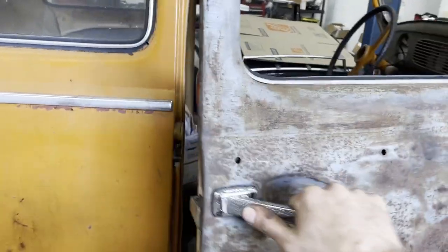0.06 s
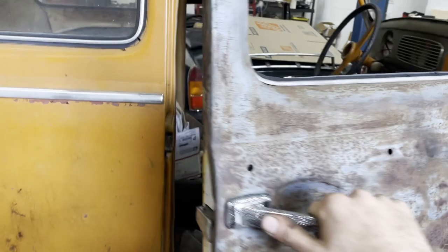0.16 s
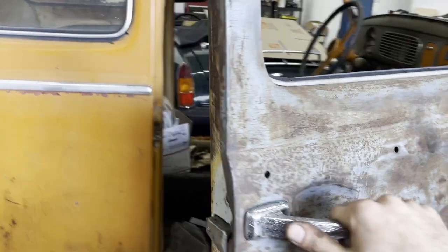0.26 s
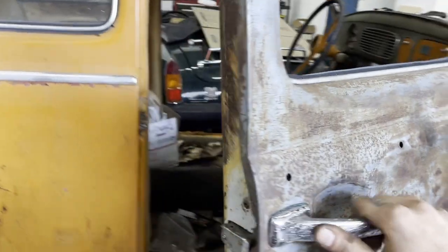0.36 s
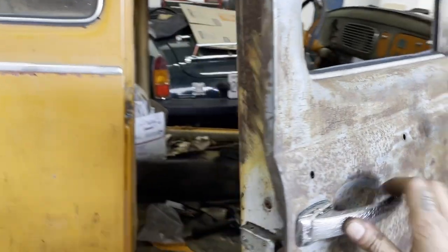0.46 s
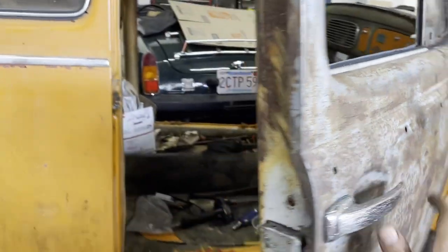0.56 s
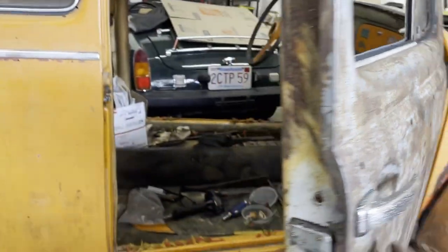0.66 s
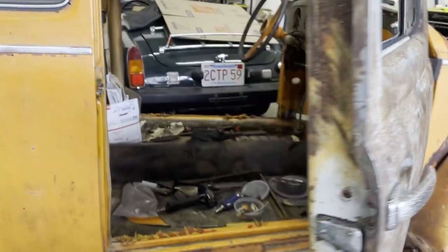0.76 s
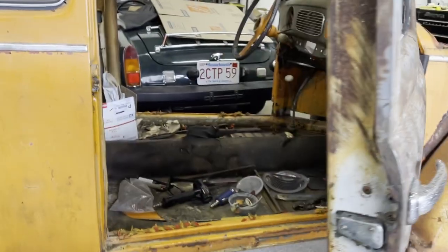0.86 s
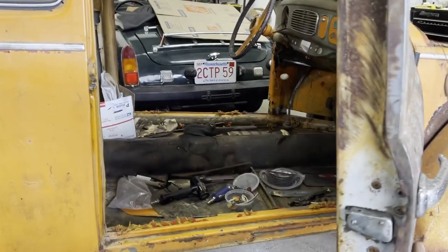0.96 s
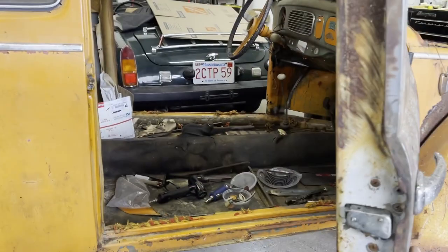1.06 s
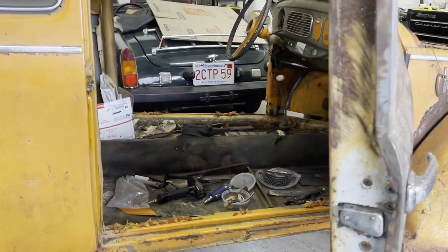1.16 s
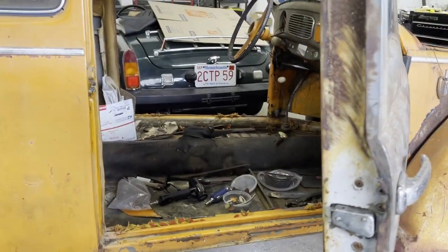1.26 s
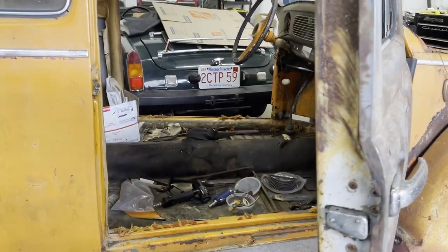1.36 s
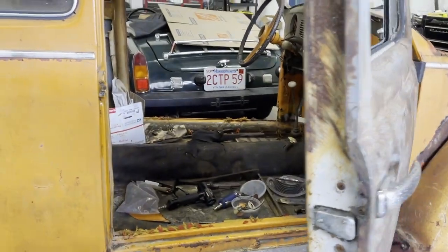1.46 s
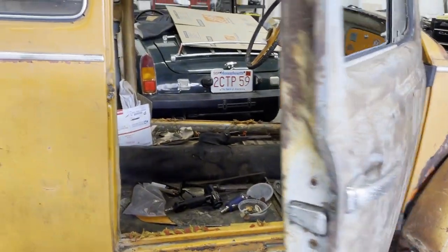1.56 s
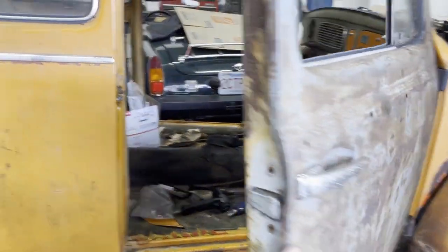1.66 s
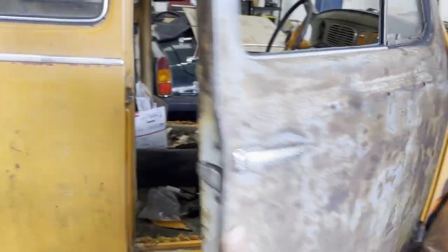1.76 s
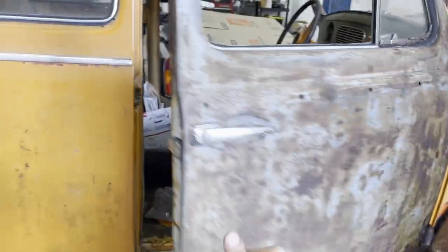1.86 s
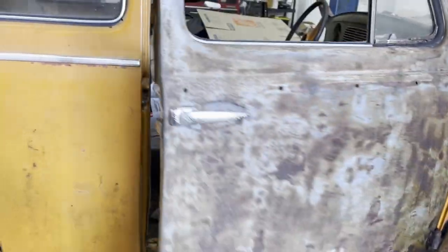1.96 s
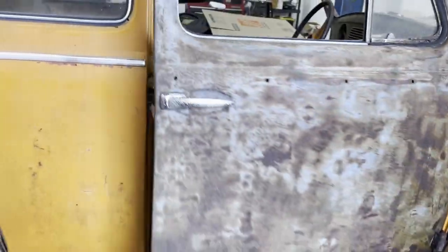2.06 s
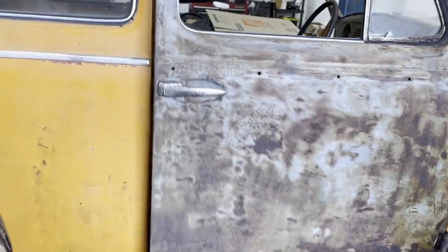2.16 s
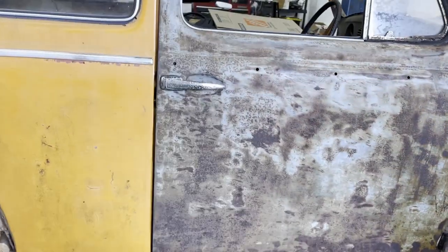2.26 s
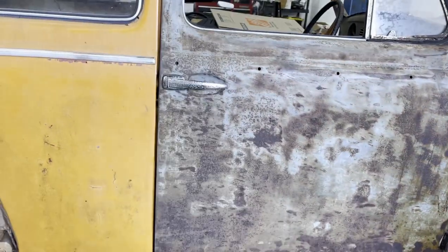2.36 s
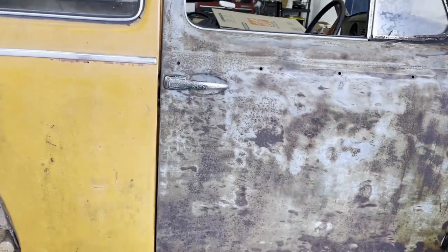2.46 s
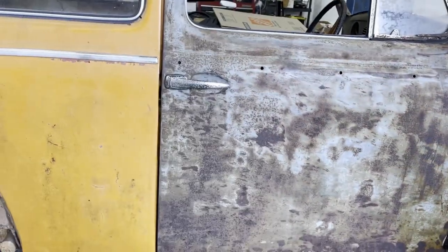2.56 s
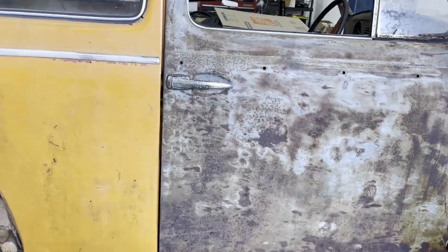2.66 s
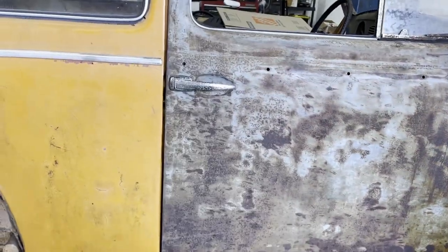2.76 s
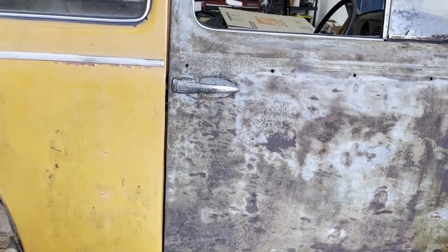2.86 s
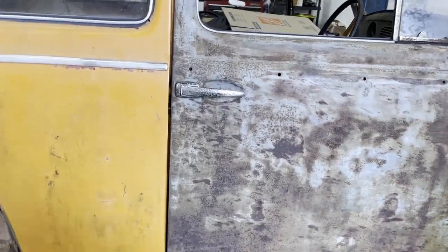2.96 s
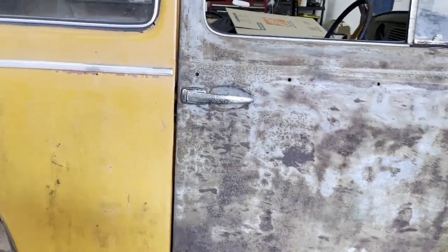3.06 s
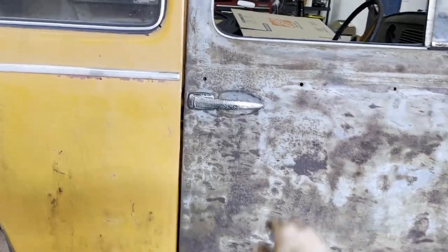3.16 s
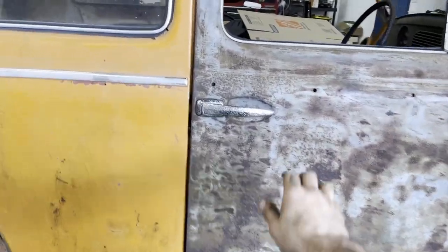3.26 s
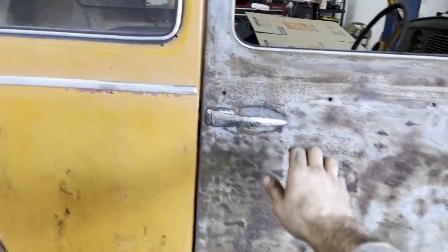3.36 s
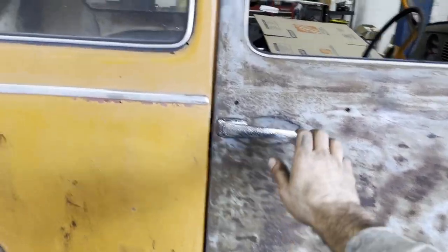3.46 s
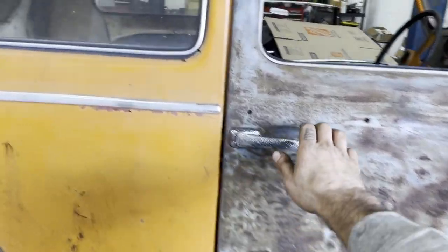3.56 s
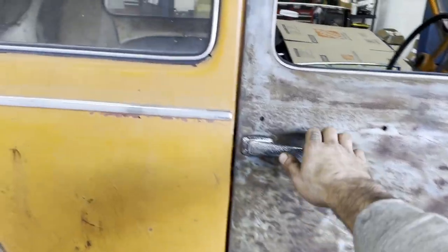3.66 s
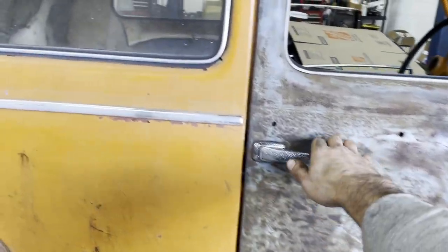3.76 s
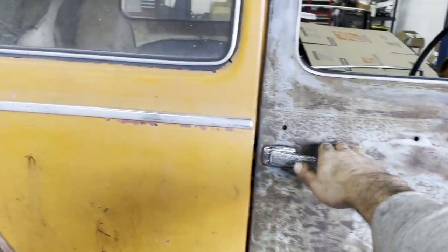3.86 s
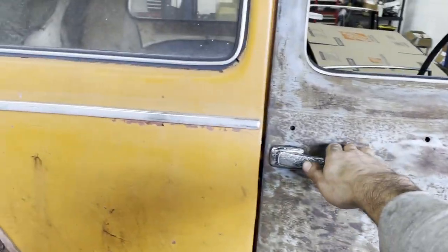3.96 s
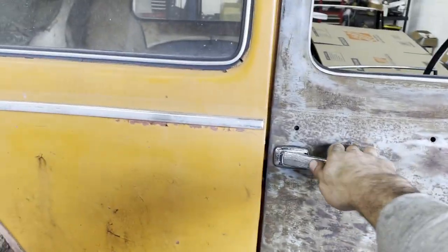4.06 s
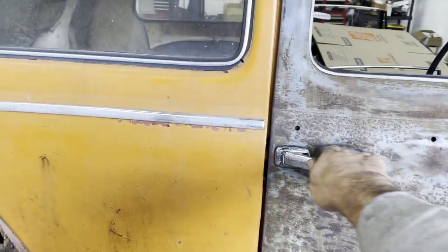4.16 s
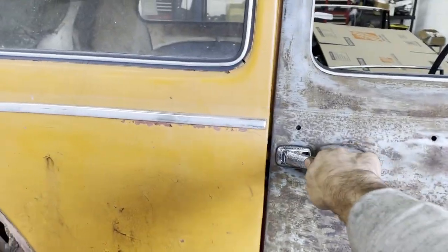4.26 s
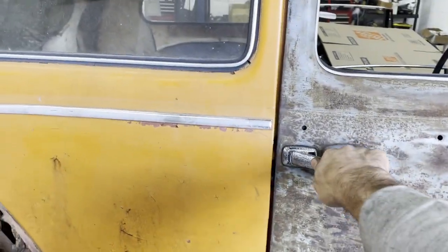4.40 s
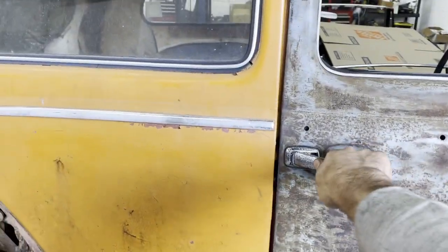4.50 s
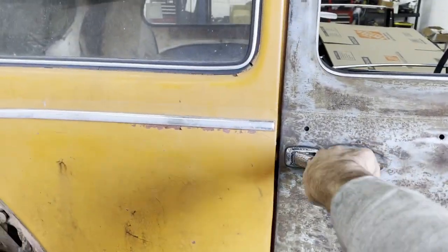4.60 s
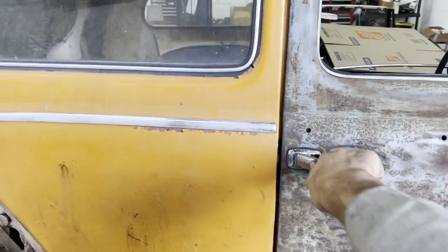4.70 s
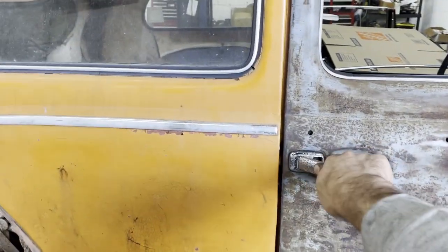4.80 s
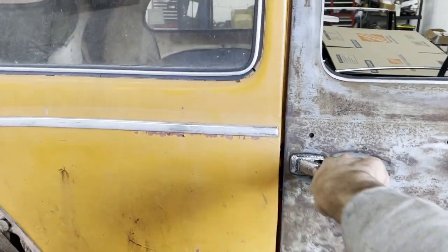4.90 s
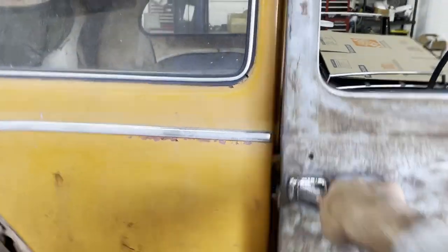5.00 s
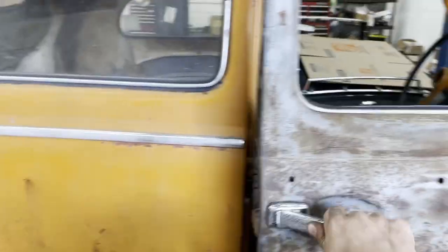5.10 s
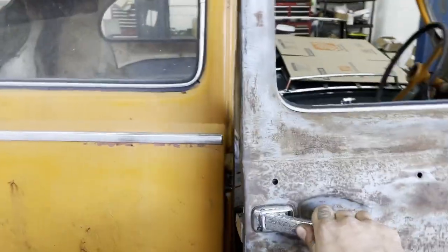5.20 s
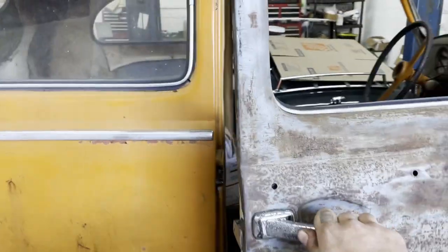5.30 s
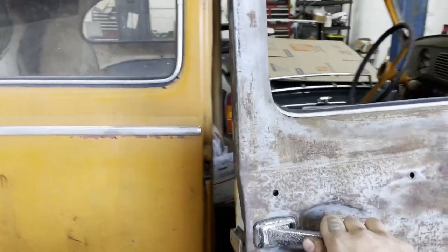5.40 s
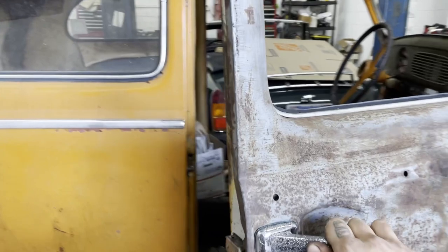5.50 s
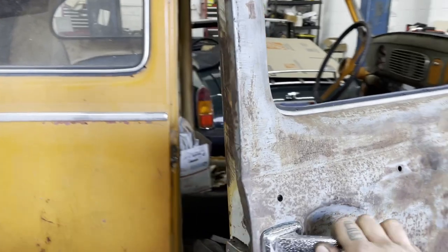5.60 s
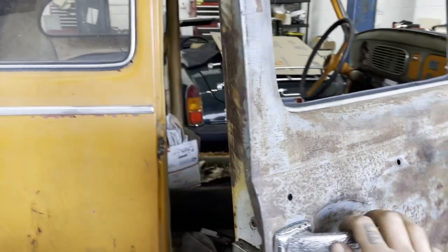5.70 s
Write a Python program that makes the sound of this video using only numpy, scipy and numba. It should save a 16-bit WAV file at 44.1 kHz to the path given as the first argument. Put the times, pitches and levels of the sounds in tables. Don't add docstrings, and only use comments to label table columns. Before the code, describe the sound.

A phone held about a metre away in a hard-walled garage with faint ventilation hum and hiss. At 0 s a heavy bare steel car door comes off its latch with a dull clunk, then until about 1 s it swings with stuttering low groans, steely creaks, hand thumps and rattling loose trim, with sharper knocks near 0.5 s. Small ticks and faint rubbing fill the quieter stretch to 2.2 s. At 2.28-2.36 s the door slams: a rapid run of clacks and deep booms, sheet metal ringing and walls echoing into a decay. From 2.9 to 3.9 s the body settles with low creaks, knocks and ticks. Around 4.07-4.25 s a hand grips and turns the handle with light clinks. At 4.62 s the latch snaps hard, clicking again at 4.72 s. At 4.95-5.14 s the door pops free with hollow knocks and a low airy thud; hinges groan and thump around 5.6 s.

```python
import sys
import numpy as np
from scipy import signal
from scipy.fft import rfft, irfft
from scipy.io import wavfile
from scipy.ndimage import uniform_filter1d
from numba import njit

SR = 44100
rng = np.random.default_rng(int(sys.argv[2]) if len(sys.argv) > 2 else 0)


def how_loud(loudness_db):
    steps = np.asarray(loudness_db, float) / 20
    return 10 ** steps


def store_wav(level_fs):
    pcm = np.round(np.clip(np.atleast_2d(level_fs), -1, 1) * 32767)
    wavfile.write(sys.argv[1], SR, pcm.T.astype(np.int16))


N = 253134

# columns f/Hz, level/dB, time to fade 60 dB/s
SHUT_MODES = [(176, 0.84, 0.33), (294.6, 0.68, 0.17)]
AJAR_MODES = [(75.36, 2.5, 0.62), (143, -7.5, 0.42), (294, -11, 0.3)]
# columns f/Hz, level/dB per Hz
SHUT_SKIN = [(18, -31), (30, 5.5), (277, 4.5), (546, -17.5), (709, -19), (1330, -17), (1440, -16),
             (2020, -26), (6050, -40.5), (7260, -33.5), (8060, -69), (9500, -81), (11900, -83.5),
             (15500, -114)]
AJAR_SKIN = [(18, -65), (30, -22.5), (85, -3.5), (192, -8.5), (230, -8), (299, -11.5), (518, -24),
             (591, -23.5), (709, -30.5), (1140, -32), (1820, -41), (6540, -42.5), (15500, -64.5)]


def unit(x):
    return x / np.sqrt(np.mean(x ** 2) + 1e-30)


def along(table, hz):
    f, v = np.transpose(table)
    return np.interp(np.log(hz + 1), np.log(f + 1), v)


def colour(x, gain):
    return irfft(rfft(x) * gain(np.fft.rfftfreq(x.shape[-1], 1 / SR)), x.shape[-1])


def wobble(rate, size):
    return unit(colour(rng.standard_normal(size), lambda hz: np.exp(-(hz / rate) ** 2)))


def fading(t, t60):
    return np.exp(-np.log(1000) * t / t60)


def hum():
    spectrum = [(15, -23.5), (25, -8.5), (64, 5.5), (344, -7.5), (373, -0.5), (404, -2.5), (438, 2.5),
                (1960, -15), (3540, -28.5), (5280, -28.5), (12500, -53), (15000, -80.5)]
    mid, side = colour(rng.standard_normal((2, N)), lambda hz: how_loud(along(spectrum, hz)))
    side = colour(side, lambda hz: 1.6 * hz / (hz + 600))
    return how_loud(-52) * unit(np.array([mid + side, mid - side]))


def strokes(rows, swell, fade):
    t = np.arange(0, N + 64, 64) / SR
    gain = 0
    for start, hold, db in rows:
        early = np.maximum(start - t, 0)
        late = np.maximum(t - start - hold, 0)
        gain = gain + how_loud(db - swell * early - fade * late)
    return np.interp(np.arange(N) / SR, t, gain)


def grains(rate, spread_db):
    happens = rng.random(N) < rate / SR
    return unit(happens * rng.choice([-1, 1], N) * how_loud(spread_db * rng.standard_normal(N)))


def groan():
    # columns start/s, hold/s, level/dB
    swing = [(0, 0.074, -36.5), (.29, 0.19, -21.5), (.5, 0.12, -23), (.68, 0.15, -24.5), (.93, 0.138, -49),
             (1.28, 0.017, -61.5), (1.47, 0.023, -59), (1.85, 0.08, -57), (2.1, 0.087, -57),
             (5.57, 0.05, -31), (5.66, 0.14, -28)]
    settle = [
        (2.9, 0.11, -42.5),
        (3.19, 0.042, -38.5),
        (3.29, 0.093, -37),
        (3.4, 0.288, -36.5),
    ]
    grip = [
        (3.85, 0.1705, -51),
        (4.07, 0.222, -39.5),
        (4.35, 0.31, -50),
    ]
    # columns f/Hz, level/dB per Hz
    swing_colour = [(15, -41.5), (45, 2.5), (80, 1), (170, -6), (340, -11), (480, -17), (650, -46),
                    (1100, -120)]
    settle_colour = [(15, -33), (102, 0), (136, -8.5), (168, -0.5), (227, -55), (500, -4.5), (650, -37),
                     (1100, -120)]
    grip_colour = [(15, -47), (64, 9.5), (139, -4.5), (274, -1.5), (436, 2.5), (500, -11), (650, -34),
                   (1100, -120)]
    jerks = grains(160, 2.66)
    out = 0
    for rows, spectrum in ((swing, swing_colour), (settle, settle_colour), (grip, grip_colour)):
        voice = colour(jerks, lambda hz: how_loud(along(spectrum, hz)) / (1 + (hz / 600) ** 4))
        out = out + strokes(rows, swell=902, fade=251.5) * unit(voice)
    return how_loud(3.0) * out


def creak():
    resonances = [(456, 66, 2.5), (534.6, 70, 9), (624.4, 70, 7), (880, 180, -6)]
    moves = [(0, 0.26, -26), (.29, 0.028, -27.5), (.415, 0.08, -24.5), (.5, 0.074, -28), (.65, 0.2, -29.5),
             (1, .04, -39), (1.11, 0.025, -36), (3.21, 0.066, -30), (3.33, 0.053, -24),
             (3.425, 0.21, -27.5), (3.65, 0.038, -31.5), (4.07, 0.029, -33.5), (4.17, 0.1, -33),
             (5.6, 0.011, -29), (5.64, 0.031, -35)]
    jerks = grains(260, 3.5)
    ring = 0
    for hz, width, db in resonances:
        peak = signal.iirpeak(hz, hz / width, SR)
        ring = ring + how_loud(db) * signal.lfilter(*peak, signal.lfilter(*peak, jerks))
    return how_loud(-13.5) * strokes(moves, swell=701.5, fade=300) * unit(ring)


def rustle():
    spectrum = [(410, -35.5), (700, 0.5), (1140, -1), (1700, -9.5), (2500, -5), (3950, -15.5),
                (5590, -16.5), (8110, -22), (12400, -34.5), (15000, -63.5)]
    moves = [(0, 0.11, -37), (.2, 0.34, -53), (.5, 0.027, -41), (.77, 0.019, -47), (.86, 0.38, -52),
             (1.68, 0.17, -60.5), (1.795, 0.029, -52.5), (1.83, .018, -41), (2.205, 0.15, -50),
             (2.95, 0.21, -60), (2.85, 0.66, -57), (3.63, 0.095, -55.5), (3.92, 0.018, -57.5),
             (4.11, 0.16, -53), (5.35, 0.31, -66.5), (5.68, 0.066, -56.5)]
    rubbing = rng.standard_normal(N) * how_loud(1.5 * wobble(40, N))
    rubbing = unit(colour(rubbing, lambda hz: how_loud(along(spectrum, hz))))
    return strokes(moves, swell=606.5, fade=197.5) * rubbing


def pings(rows, buzz_db, cycles=1.63, wander=0.):
    out, t = np.zeros(N + SR), np.arange(SR) / SR
    buzz = np.tanh(wobble(150, N))
    for s, db, hz, t60 in rows:
        loose = wander * np.roll(buzz, int(hz))[:SR]
        swell = 1 - np.exp(-t * hz / cycles)
        note = np.sin(2 * np.pi * hz * t + loose) * fading(t, t60) * swell
        start = int(s * SR)
        out[start:start + SR] += how_loud(db) * note
    return out[:N] * how_loud(buzz_db * buzz)


def handle_and_latch():
    let_go = [(2030, 0, 0.098), (2417, -13, 0.69), (2977, -13, 0.48), (3284, -24, 5.0), (4506, -29, 1.2),
              (5405, -23, 0.87), (6772, -29, 0.59)]
    touch = [(3822, -29, 0.066), (3790, -38, 0.49), (3840, -43, .3), (3760, -28.5, 0.09), (7540, -40, 0.03),
             (7360, -46, 0.092)]
    turn = [(2603, -30, 0.095), (2660, -36.5, 0.46), (2740, -40, .3), (5500, -37, .04), (5120, -46, .15),
            (2800, -36.5, 0.22), (2900, -39, 0.18), (3120, -34.5, 0.046), (5260, -47, 0.35),
            (5330, -46, .2), (5750, -46, .12), (5280, -39, 0.055), (5660, -42, 0.06), (5450, -49, .04)]
    rows = [(0, -36 + db, hz, min(t60, .5)) for hz, db, t60 in let_go]
    rows += [(4.146, db, hz, t60) for hz, db, t60 in touch]
    rows += [(4.229, db, hz, t60) for hz, db, t60 in turn]
    return pings(rows, buzz_db=4, cycles=3, wander=1.6)


def tail(spectrum, t60s, size=65536):
    t, f = np.arange(size) / SR, np.fft.rfftfreq(size, 1 / SR)
    noise = rfft(rng.standard_normal(size)) * how_loud(along(spectrum, f))
    out = 0
    for hz in 30 * 2 ** np.arange(0, 9.5, .5):
        band = np.clip(1 - 2 * abs(np.log2(f / hz + 1e-9)), 0, 1)
        t60 = along(t60s, hz)
        out = out + irfft(noise * band) * 1000. ** (-t / t60) / np.sqrt(t60)
    bins = rfft(out)
    even = how_loud(along(spectrum, f)) / np.sqrt(uniform_filter1d(abs(bins) ** 2, size=16) + 1e-30)
    out = irfft(bins * even / np.median(even)) * (t < .75 * t[-1])
    return out / np.linalg.norm(out)


def door_ring(modes, skin, modes_db):
    # columns f/Hz, t60/s
    skin_t60 = [(40, 0.88), (150, 0.75), (500, 0.41), (1500, 0.17), (4000, 0.2), (12000, 0.068)]
    t = np.arange(65536) / SR
    clear = 0
    for hz, db, t60 in modes:
        waver = 3.8 * wobble(4 + hz / 40, len(t))
        clear = clear + how_loud(db + waver) * np.sin(2 * np.pi * hz * t) * fading(t, t60)
    body = tail(skin, skin_t60) + how_loud(modes_db) * clear / np.linalg.norm(clear)
    impulse = 1. * (np.arange(1024) == 40)
    click = colour(impulse, lambda hz: how_loud(1.08 * along(skin, hz)) * hz / (hz + 700))
    window = np.minimum(np.arange(512) / 40, 1) ** 2 * np.hanning(1024)[512:]
    body[:512] += how_loud(-24.0) * click[:512] * window / np.linalg.norm(click)
    return body


def door(blows, modes, skin, modes_db, rise):
    body = door_ring(modes, skin, modes_db)
    force, u = np.zeros((3, N + 4096)), np.arange(4096) / SR
    for s, clack_db, boom_db, crack_db, length in blows:
        shape = np.exp(-u / max(length, 3e-4)) * (1 - np.exp(-u / rise))
        scrape = rng.standard_normal(4096) * shape
        for _ in range(16):
            scrape = irfft(np.exp(1j * np.angle(rfft(scrape)))) * np.minimum(1, 5 * shape)
        scrape = scrape / np.linalg.norm(scrape)
        push = np.exp(-u / rise)
        start = int(s * SR)
        for row, db, hit in zip(force, (clack_db, boom_db, crack_db), (scrape, push / push.sum(), scrape)):
            row[start:start + 4096] += how_loud(db) * hit
    edges = [([400, 3000], "band"), (400, "low"), (3000, "high")]
    out = 0
    for hits, (hz, kind), db in zip(force, edges, (-6, -1.5, -5)):
        part = signal.sosfilt(signal.butter(3, hz, kind, fs=SR, output="sos"), body)
        out = out + signal.fftconvolve(hits, how_loud(db) * part / part[:900].std())[:N]
    return out


def release():
    blows = [
        (0.002, -23, -18.5, -62, 0.0045),
        (0.058, -23, -20.5, -67, 0.0052),
        (0.504, -22, -30.5, -43.5, 0.014),
        (0.522, -37.5, -31.5, -50.5, 0.0033),
        (0.554, -20, -23.5, -41.5, 0.0053),
        (0.575, -30.5, -24, -53, 0.0016),
    ]
    return door(blows, AJAR_MODES, AJAR_SKIN, modes_db=-4, rise=0.001)


def loose_parts():
    lone = [(.486, -28, 2525, 0.09), (.497, -30, 2400, 0.08), (.06, -45, 5450, 0.2), (.585, -47, 3560, 0.2),
            (.64, -52, 3600, .4), (.59, -54, 4650, .5), (.66, -51, 4640, 0.35), (.39, -48, 3700, .05),
            (.52, -38, 2330, .1), (.55, -39, 2370, .1), (1.82, -47, 1200, .15), (1.843, -34, 1170, 0.22),
            (1.845, -39, 1090, .05), (1.81, -44, 770, .2), (1.96, -49, 1170, .15), (2.2745, -24, 1400, .02),
            (2.203, -36, 1310, 0.12), (2.203, -38, 1480, .1), (3.11, -52, 2400, .12),
            (3.195, -38, 1340, .05), (3.196, -41, 1950, .04), (3.196, -41, 2500, .04),
            (3.197, -44, 3100, .04), (3.25, -42, 1380, .05), (3.315, -42, 1400, .06),
            (3.41, -44, 2000, .04), (3.63, -36, 1328, 0.06), (3.635, -37, 1180, 0.06),
            (3.663, -39, 2000, 0.04), (3.663, -40, 1010, .05), (4.112, -50, 3800, .2),
            (4.108, -40, 1300, .06), (4.109, -46, 4200, .03)]
    knocks = [(.41, -23, 460), (.476, -29, 611), (.513, -20, 470), (.557, -20, 471), (.647, -30, 550),
              (.67, -29, 590), (.753, -20, 615), (.937, -37, 586), (.956, -24.5, 604), (1.005, -40, 598),
              (1.023, -34, 626), (1.321, -33, 570), (3.277, -26, 500), (3.469, -27, 504), (3.49, -26, 579),
              (3.54, -33, 540), (3.638, -32, 568), (3.178, -26, 642), (3.2, -28, 621), (3.249, -26.5, 648),
              (3.315, -19.5, 652), (3.41, -23.5, 546), (3.568, -27, 543), (3.659, -25.5, 517),
              (3.69, -28.5, 621), (3.755, -34, 556), (3.37, -28, 640), (3.848, -39, 547), (3.879, -31, 576),
              (3.9, -35, 593), (5.471, -39, 584), (5.601, -33.5, 610), (5.701, -36, 602)]
    trim = [(s, db, hz, 0.068) for s, db, hz in knocks]
    return pings([*lone, *trim], buzz_db=3, wander=.5)


def thumps():
    rows = [(0.291, -10, 192, 0.076), (0.375, 1.5, 92, 0.094), (0.402, -7.5, 114.5, 0.26),
            (0.583, -7.5, 165.5, 0.1), (0.768, -11, 155, 0.084), (0.825, -17, 71.2, 0.057),
            (1.045, -22, 126, 0.045), (1.075, -21, 62, 0.088), (3.283, -19, 101.3, 0.42),
            (3.32, -12, 92, 0.1), (3.558, -22, 115.7, 0.075), (4.064, -26, 290, 0.086),
            (5.563, -3, 89, 0.075), (5.605, -12.5, 137, 0.14), (5.674, -5.5, 120.6, 0.072),
            (5.697, -7.5, 95, 0.097), (5.71, -6.5, 111.5, 0.095)]
    return pings(rows, buzz_db=1.5)


def edge_snaps():
    rows = [(0.517, -36, .004, 2800), (0.549, -36, .004, 4000), (.571, -32, .006, 1000),
            (.585, -34, .005, 1100), (.872, -50, .003, 1200), (1.785, -60, .015, 9000),
            (1.812, -52, .015, 9000), (1.832, -50, .015, 8000), (2.2795, -25, .003, 5000),
            (2.293, -10, .008, 900), (2.2922, -14, .003, 10000), (2.2925, -13, .003, 2500),
            (2.333, -26, .003, 11000), (3.195, -46, .005, 1900), (3.251, -46, .004, 1300),
            (3.277, -50, .004, 2200), (3.314, -46, .004, 1600), (3.411, -48, .004, 1500),
            (3.448, -52, .003, 1200), (3.562, -49, .003, 1100), (3.585, -53, .003, 1100),
            (3.631, -49, .006, 1500), (3.663, -48, .005, 1500), (3.692, -51, .004, 2000),
            (4.108, -46, 0.005, 2500), (4.146, -56, .004, 6000), (4.229, -49, .006, 5500),
            (4.7152, -33, .004, 9000), (4.7152, -29, .004, 1600), (4.944, -50, .008, 8000),
            (4.954, -32, .004, 4000), (4.959, -29, .007, 8000), (5.008, -38, .004, 6000),
            (5.1352, -29, 0.003, 5000), (5.1352, -42, .002, 14000), (5.137, -27, .005, 900)]
    out, t = np.zeros(N + 2048), np.arange(2048) / SR
    for s, db, length, hz in rows:
        grit = rng.standard_normal(2048) * np.exp(-t / max(length, 5e-4))
        broad = signal.iirpeak(hz, .7, SR)
        burst = signal.lfilter(*broad, signal.lfilter(*broad, grit))
        start = int(s * SR)
        out[start:start + 2048] += how_loud(db) * burst / burst[:100].std()
    return out[:N]


def ticks():
    blows = [
        (2.046, -60.5, -46, -64, 0.0055),
        (3.194, -38, -31.5, -65, 0.0056),
        (3.249, -39.5, -55, -64.5, 0.0036),
        (3.315, -37.5, -37, -70, 0.0053),
        (3.41, -46, -32.5, -75, 0.004),
        (3.567, -47, -37, -79, 0.0051),
        (3.637, -41.5, -53, -72, 0.0051),
        (3.659, -41, -34.5, -70, 0.004),
        (3.949, -50.5, -42.5, -55, 0.0045),
    ]
    return door(blows, SHUT_MODES, SHUT_SKIN, modes_db=-10.5, rise=0.0016)


def latch_snap():
    blows = [
        (2.202, -30.5, -47, -44.5, 0.0088),
        (4.067, -47, -35.5, -76, 0.0096),
        (4.107, -36.5, -40, -54, 0.011),
        (4.146, -31.5, -38, -57, 0.011),
        (4.228, -38, -33.5, -47.5, 0.0068),
        (4.616, -15.5, -29, -37.5, 0.0059),
        (4.625, -13.5, -14, -25, 0.0057),
        (4.637, -15.5, -22.5, -33, 0.0045),
        (4.715, -22.5, -35, -32.5, 0.0042),
    ]
    return door(blows, SHUT_MODES, SHUT_SKIN, modes_db=-4.0, rise=0.00049)


def slam():
    blows = [
        (2.2795, -10.5, -23, -17.5, 0.0038),
        (2.285, -13.5, -10, -21, 0.0047),
        (2.292, -4, -4, -18, 0.0053),
        (2.308, -16.5, -3.5, -16, 0.0047),
        (2.335, -20, -3.5, -17, 0.0061),
        (2.353, -8.5, -5, -19, 0.0096),
    ]
    # columns f/Hz, level/dB, t60/s
    modes = [(92.6, -16.5, 1.12), (168.1, -7.5, 0.18), (303.3, -20.5, 0.99)]
    # columns f/Hz, level/dB per Hz
    skin = [(18, -49), (36, -12), (81, -17), (160, -34.5), (219, -12.5), (307, -9), (561, -19), (709, -16),
            (1720, -24.5), (6210, -28.5), (12300, -36), (14300, -51), (15500, -53.5)]
    return door(blows, modes, skin, modes_db=-4.0, rise=0.00085)


def flex():
    rows = [(2.302, -4.5, 83, 0.34), (2.325, 3.5, 84.3, 0.21), (2.4, -9, 76, 0.15),
            (2.405, -17, 325, 0.099), (2.575, -18.5, 337, 0.17), (2.8, -26, 108, 0.13),
            (2.83, -24, 110, 0.13), (5, -12, 150, 0.32), (5.075, -11.5, 105, .2), (5.09, -19, 388, 0.22),
            (5.14, -20.5, 66, 1.1), (2.45, -19, 125, .9), (4.628, -16.5, 91, .15), (5.23, -23.5, 390, .2),
            (4.632, -12.5, 168.7, .25), (2.3, -9.5, 165, 0.17), (2.284, -12.5, 300, 0.12),
            (2.72, -28, 310, 0.89), (2.62, -23, 200, 0.34), (4.964, -12, 295, 0.27), (4.63, -8, 290, 0.19)]
    return pings(rows, buzz_db=6.5)


def latch_clacks():
    rows = [(2.292, -3, 742, 0.088), (2.307, -10, 1250, .04), (2.293, -8, 930, 0.049),
            (2.296, -13.5, 1050, 0.04), (5.2, -26.5, 580, 0.18), (2.298, -16.5, 1350, 0.04),
            (2.334, -22.5, 6430, 0.048), (4.625, -1, 1400, 0.05), (4.64, -21, 1480, .15),
            (4.626, -10.5, 1532, 0.056), (4.628, -15, 957, 0.069), (4.63, -14, 711, 0.11),
            (4.634, -21.5, 5940, 0.039), (4.636, -23.5, 6400, 0.033), (4.716, -14.5, 1345, 0.033),
            (4.615, -12.5, 1000, .03), (4.617, -14, 1200, 0.037), (4.958, -21, 2100, 0.071),
            (4.958, -14, 1480, 0.083), (5.135, -19, 3900, 0.017), (5.137, -26, 4500, .02),
            (5.136, -27, 8200, .015), (5.14, -17.5, 880, 0.088), (5.136, -15, 624, 0.052),
            (4.633, -40, 11750, .05), (4.957, -9, 724, 0.062), (4.957, -12.5, 1236, 0.076),
            (4.96, -23.5, 1680, 0.084), (5.006, -17, 1126, 0.054), (5.006, -12.5, 730, .05),
            (5.045, -16.5, 730, 0.095), (2.575, -23.5, 759, 0.11), (5.142, -24, 570, 0.54)]
    return pings(rows, buzz_db=4)


def pop():
    blows = [
        (4.946, -22.5, -28.5, -36, 0.0042),
        (4.955, -13, -21.5, -25, 0.0092),
        (4.961, -11.5, -14.5, -32, 0.0061),
        (5.004, -14.5, -15, -43.5, 0.0061),
        (5.136, -20, -30.5, -45.5, 0.004),
    ]
    return door(blows, AJAR_MODES, AJAR_SKIN, modes_db=-4.0, rise=0.0012)


def seal_spring():
    rows = [
        (4.9678, 0, 182, .07),
        (4.979, 1.5, 73, .2),
        (5.044, -7, 78, .3),
    ]
    return -pings(rows, buzz_db=1.5, cycles=0.12)


def wide(steel):
    smear = rng.standard_normal(2048) * np.exp(-np.arange(2048) / SR / 0.014)
    side = signal.fftconvolve(steel, smear / np.linalg.norm(smear))[:N]
    side = colour(side, lambda hz: hz ** 2 / (hz ** 2 + 1500 ** 2) / (1 + (hz / 6200) ** 10))
    return how_loud(-0.5) * side * np.array([[1], [-1]])


def garage(sent):
    spectrum = [(40, -0.5), (250, 1), (1000, 0), (4000, 0.5), (12000, 1)]
    echo_t60 = [(40, 1.6), (250, 1.36), (700, 1.22), (2000, 1), (5000, 0.84), (10000, 0.49), (14000, 0.19)]
    mid, side = (np.roll(signal.fftconvolve(sent, tail(spectrum, echo_t60))[:N], 300) for _ in range(2))
    side = colour(side, lambda hz: 1.4 * (hz + 130) / (hz + 900) / (1 + (hz / 6300) ** 8))
    return how_loud(-7.5) * np.array([mid + side, mid - side])


def scene():
    rub = creak() + rustle()
    grip = groan() + thumps()
    handle, parts, clacks = handle_and_latch(), loose_parts(), latch_clacks()
    grit = edge_snaps()
    steel = release() + ticks() + latch_snap() + slam() + pop()
    steel = steel + flex() + grit + seal_spring()
    sent = steel - 0.59 * grit + rub + how_loud(-16.0) * clacks
    sent = sent + how_loud(-6) * parts + how_loud(-11) * handle + how_loud(-16.0) * grip
    direct = steel + handle + clacks + rub + parts + grip
    spread = wide(steel + parts + handle + how_loud(-7.0) * clacks)
    return direct + spread + garage(sent) + hum()


@njit
def follow(x, attack, release):
    out, e = np.empty(len(x)), 0.
    for i in range(len(x)):
        e += (x[i] - e) * (attack if x[i] > e else release)
        out[i] = e
    return out


def low_pass(x):
    return signal.sosfilt(signal.butter(12, 15690, fs=SR, output="sos"), x)


def record(dry):
    # columns f/Hz, phase/radians
    port_lead = [(0, 0), (6000, -.2), (7000, -2), (8500, -3.4), (9100, -4.1), (10700, -5.5), (11700, -6.3),
                 (12900, -7.2), (13800, -8.6), (14500, -9.3), (16000, -9.75)]
    # columns f/Hz, level/dB
    left_excess = [(60, 1), (250, 0), (1000, .5), (2500, 3.3), (5000, 2.5), (8000, 0)]

    def lean(hz):
        return how_loud(along(left_excess, hz) / 2) * np.exp(.5j * along(port_lead, hz))

    dry = signal.sosfilt(signal.butter(3, 42, "high", fs=SR, output="sos"), dry)
    dry = colour(dry, lambda hz: how_loud(4 * np.clip((hz - 13000) / 1500, 0, 1)))
    dry = colour(dry, lambda hz: 1 / (1 + (hz / 15690 / 1.02) ** 80))
    x = np.array([colour(dry[0], lean), colour(dry[1], lambda hz: 1 / lean(hz))])
    envelope = follow(abs(x).max(axis=0), 1 / (0.0031 * SR), 1 / (.15 * SR))
    x = x * np.minimum(1, how_loud(-7) / (envelope + 1e-9)) ** .2
    mix = np.tanh(0.59 * x) / 0.93
    return low_pass(mix)


dry = scene()
out = record(dry)
store_wav(out)
```